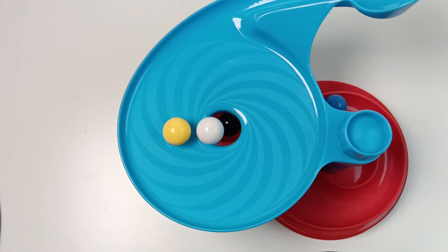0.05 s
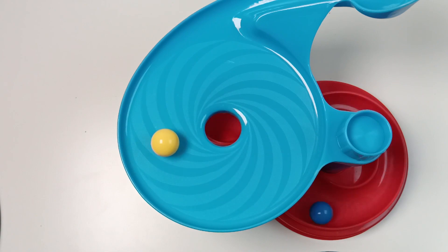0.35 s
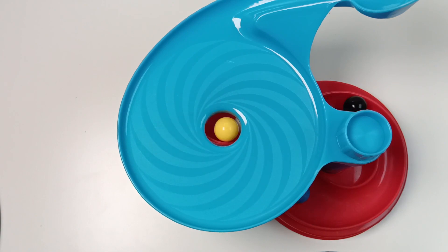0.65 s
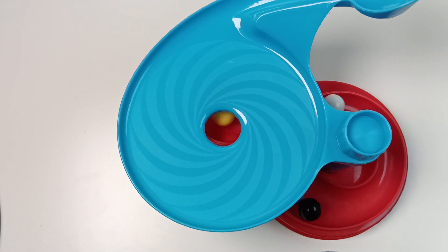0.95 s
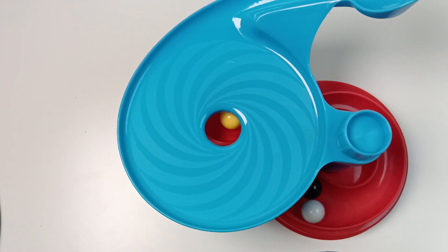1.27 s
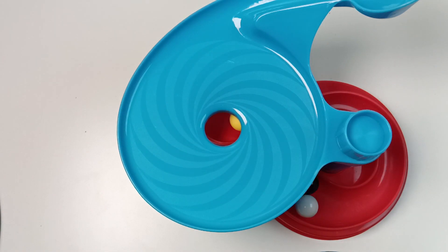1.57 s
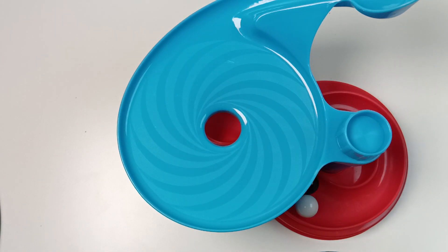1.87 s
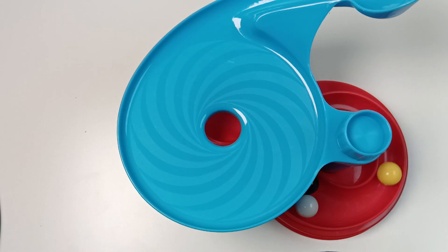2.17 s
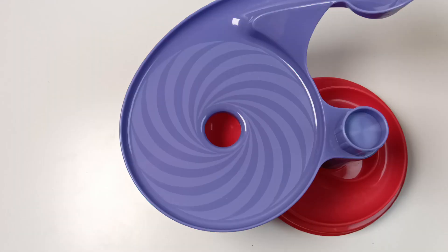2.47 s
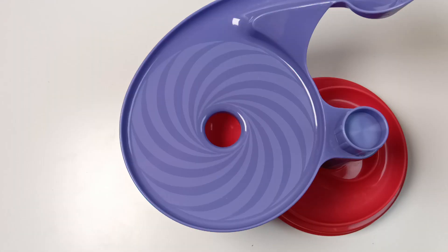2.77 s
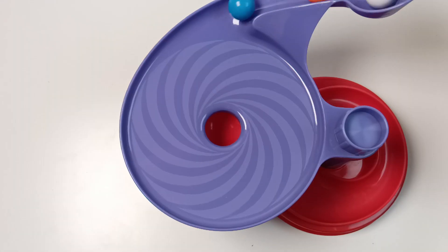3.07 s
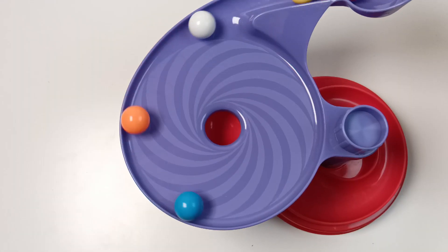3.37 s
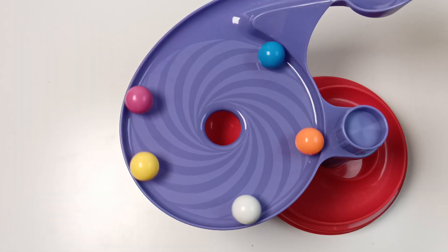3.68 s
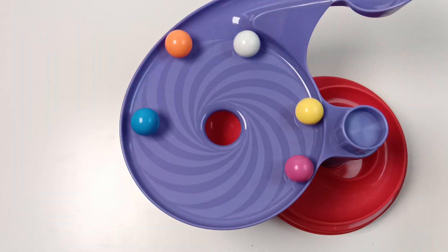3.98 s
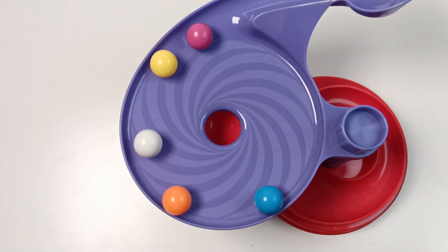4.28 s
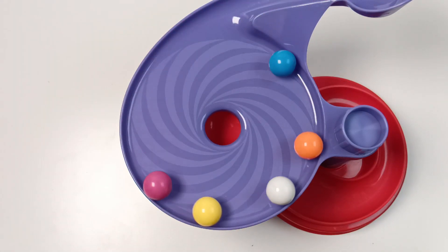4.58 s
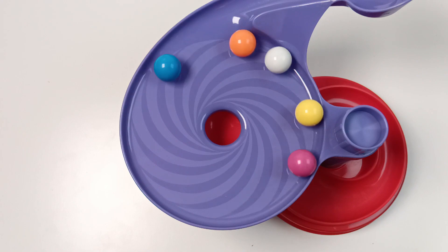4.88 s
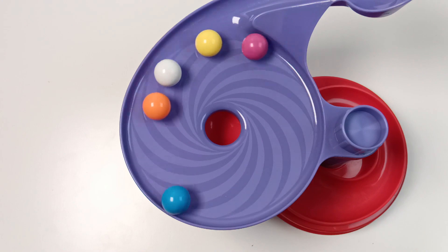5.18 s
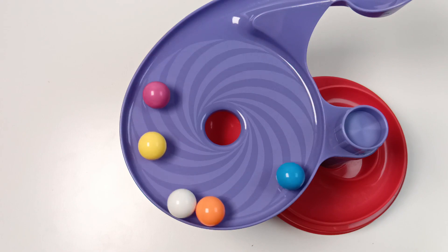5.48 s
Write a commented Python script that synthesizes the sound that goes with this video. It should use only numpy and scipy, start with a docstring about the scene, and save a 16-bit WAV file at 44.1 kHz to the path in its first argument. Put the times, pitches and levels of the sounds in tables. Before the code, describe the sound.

Heard from close above in a small room, marbles clatter through a plastic toy run, each knock ringing briefly, with ticks and whirring as they circle a dish. The sound cuts off, and after a moment of quiet another batch bounces down a ramp. These roll round and round a bowl with a wavering, hollow rumble that gradually fades, dotted with light clacks against the rim.

```python
"""Marbles clatter and roll through a plastic toy run in a small room, heard from just above. First they drop
through a funnel's throat, knock down the tower and circle in a dish; that sound breaks off. Then five marbles
land on a ramp, swirl round a bowl, hop off each other or at its entry notch, bump its rim and slow down. Each
knock sets the plastic ringing. Rolling shakes it with tiny bumps and a whirr that rises with speed. Behind them
are the low hum of the swaying stand, a thin high tone, short echoes and still air."""
import sys
import numpy as np
from scipy import signal
from scipy.fft import rfft, irfft
from scipy.io import wavfile
from scipy.ndimage import uniform_filter1d

SR = 44100
rng = np.random.default_rng(int(sys.argv[2]) if len(sys.argv) > 2 else 0)


def pcm_store(signal):
    """Save signal as 16-bit PCM."""
    levels = np.round(np.clip(np.atleast_2d(signal), -1, 1) * 32767)
    wavfile.write(sys.argv[1], SR, levels.astype(np.int16).T)


N = 248724
TIME = np.arange(N) / SR
TAPS = 4096  # samples in one filter or one knock
HZ = np.fft.rfftfreq(TAPS, 1 / SR)

# Marbles land in the tower and dish. Each row: start in seconds, level in dB, extra body in dB,
# extra sharpness in dB, first hop in seconds, loss per bounce in dB.
TOWER_LANDINGS = [(0.1126, -56, 5, -31, 0.016, 10), (0.3534, -23, 6.5, 2, .0185, 2),
                  (0.4156, -22, -6.5, -1.5, 0.024, 2.5), (0.4802, -28, -3, -5, 0.025, 13.5),
                  (0.5253, -30.5, 2.5, -2, .009, 3.5), (0.5362, -18.5, -3, 0, 0.035, 11),
                  (0.5849, -22, 0.5, -2, .018, 11), (0.732, -31.5, -19, -17, 0.02, 3),
                  (0.774, -21, -2, -4.5, .0174, 6), (0.7802, -21, -5, -0.5, .037, 2.5),
                  (1.0541, -23, 0.5, 5, 0.031, 5), (1.1043, -25.5, 1.5, -1.5, .0113, 4),
                  (1.215, -36.5, -9.5, -9.5, .025, 15), (1.394, -30, -12, 4.5, 0.0077, 13),
                  (1.4126, -24.5, -0.5, 6.5, 0.022, 3.5), (1.448, -29, 4.5, -2.5, .008, 7.5),
                  (1.7529, -30.5, -31, -20, 0.041, 24), (2.2578, -43.5, -3, -16.5, 0.022, 12),
                  (2.4125, -28.5, 3.5, 9.5, 0.016, 5.5)]
# The tower's overall tone. Each row: frequency in Hz, gain in dB.
TOWER_TONE = [(60, -30), (250, -28), (500, -7), (1000, -4), (2500, 2), (5000, -7.5), (9000, -16),
              (13000, -33), (15500, -30.5)]
# The notes the tower rings at. Each row: pitch in Hz, width in Hz, boost in dB.
TOWER_NOTES = [(115.1, 20, 20), (189, 49, 17), (455, 37, 2.6), (553, 39, 5), (663.4, 65, 13.7),
               (1189, 28, 11), (1708, 54, 4.8), (2107, 61, 8.2), (6620, 280, 6)]


def tower():
    """Marbles bounce down the tower, making it ring, and circle in the dish."""
    blows = [blow for row in TOWER_LANDINGS
             for blow in bounces(*row, fuller_db=0.23, duller_db=5, count=3)]
    gain_db = plastic(TOWER_TONE, TOWER_NOTES)
    falls = knocks(blows, gain_db, fade_s=0.0019, ring_s=0.0093, ring_db=-5, alike_hz=1680)
    return room(falls + dish_roll() + dish_ticks(), wet_db=-4, build_s=0.0048)


# Marbles land on the ramp. Each row: start in seconds, level in dB, first hop in seconds.
RAMP_LANDINGS = [(2.9683, -21.5, 0.014), (3.0762, -21, 0.018), (3.1221, -31.5, .012), (3.1954, -22, .015),
                 (3.2455, -28.5, 0.0077), (3.2884, -27, .0057), (3.3606, -21, .035), (3.4534, -21.5, .0205),
                 (3.604, -41, 0.0096)]
# They skitter down it. Each row: start in seconds, length in seconds, level in dB.
RAMP_SKITTER = [(2.975, 0.667, -46.5)]
# The ramp's overall tone. Each row: frequency in Hz, gain in dB.
RAMP_TONE = [(60, -32.5), (150, -8.5), (300, -16), (600, -1.5), (1300, 0.5), (3200, -3.5), (6000, -8.5),
             (10500, -16.5), (13000, -21.5), (15500, -16)]
# The notes the ramp rings at. Each row: pitch in Hz, width in Hz, boost in dB.
RAMP_NOTES = [(197.8, 17.5, 10.4), (504, 370, 1.7), (570, 77, 3.7), (656.5, 22, 8.1), (1300, 74, 7.8),
              (1580, 130, 2.7), (3114, 400, 6.7), (4030, 390, 6.1), (4200, 110, 2.8), (6690, 100, 6.1)]
FIRST_DROP_S = RAMP_LANDINGS[0][0]


def ramp():
    """Marbles land on the ramp, bounce and skitter down it."""
    gain_db = plastic(RAMP_TONE, RAMP_NOTES)
    blows = []
    for s, db, hop_s in RAMP_LANDINGS:
        blows += bounces(s, db, body_db=-2, sharp_db=-1.7, hop_s=hop_s,
                         loss_db=6, fuller_db=3.5, duller_db=2.5, count=2)
    landings = knocks(blows, gain_db, fade_s=0.0015, ring_s=0.012, ring_db=-2.5, alike_hz=1780)
    brighter_db = read([(2000, 2), (8000, 6)], HZ)
    skitter = chatter(RAMP_SKITTER, gain_db + brighter_db, hops_per_s=730, spread_db=2)
    slightly_left = amp([[0.25], [-0.25]])
    return room((landings + skitter) * slightly_left, wet_db=-0.5, build_s=0.0051)


def bowl():
    """Marbles clack, roll and hum round the bowl."""
    clacks, roll = rim_clacks(), bowl_roll()
    return room(clacks + roll + glides(), wet_db=-8, build_s=0.0018)


# A marble hops as it knocks another marble or passes the bowl's entry notch, and lands against the rim. # Each
# row: take-off in seconds, hop length in seconds, landing level in dB.
RIM_HOPS = [(3.9399, .0283, -34.5), (4.0913, 0.025, -33.5), (4.2101, 0.028, -29), (4.3487, .0251, -29.5),
            (4.4417, .0216, -32), (4.615, 0.01, -65), (4.7128, 0.012, -37.5), (5.181, 0.0045, -55),
            (5.3138, 0.0071, -49), (5.5281, 0.01, -44.5), (5.6049, 0.0094, -39.5)]
# The rim's overall tone. Each row: frequency in Hz, gain in dB.
RIM_TONE = [(60, -21.5), (170, -5.5), (300, -17.5), (600, -3.5), (1500, -0.5), (5000, -13.5),
            (10000, -17.5), (15500, -32)]
# The notes the rim rings at. Each row: pitch in Hz, width in Hz, boost in dB.
RIM_NOTES = [(586, 220, 14.6), (1237, 51, 6.1), (1710, 336, 13.4), (3094, 370, 10.8), (3850, 190, 10.3),
             (5720, 1200, 7.3)]


def rim_clacks(fast_hop_s=0.028, rattle_db=-43, lead_s=0.0098, trail_s=0.021):
    """Each hop is a tick at take-off, a rattle, and a landing with one bounce."""
    blows, rattles = [], []
    for s, hop_s, db in RIM_HOPS:
        # A shorter hop means a slower marble, which sounds weaker, thinner and duller.
        pace_db = 20 * np.log10(hop_s / fast_hop_s)
        change_db = pace_db * np.array([0.63, 1, 1.56])  # level, body, sharpness
        take_off_db = (-41.5, 4, 11.5) + change_db
        body_db, sharp_db = (-7, 1.5) + change_db[1:]
        blows.append((s, *take_off_db))
        blows += bounces(s + hop_s, db, body_db, sharp_db, HOP_SHARE * hop_s,
                         loss_db=7.5, fuller_db=-2.5, duller_db=20, count=1)
        rattles.append((s - lead_s, lead_s + hop_s + trail_s, rattle_db + pace_db))
    gain_db = plastic(RIM_TONE, RIM_NOTES)
    clacks = knocks(blows, gain_db, fade_s=0.0025, ring_s=0.01, ring_db=-2, alike_hz=1770)
    return clacks + chatter(rattles, gain_db, hops_per_s=990, spread_db=0)


# The bowl's overall tone. Each row: frequency in Hz, gain in dB.
BOWL_TONE = [(60, -30), (300, -10.5), (600, 3), (1700, 0), (2600, -8.5), (5000, -16), (10000, -29.5),
             (15500, -66.5)]
# The notes the bowl rings at. Each row: pitch in Hz, width in Hz, boost in dB.
BOWL_NOTES = [(180, 47, 14), (550, 230, 5.8), (788, 59, 6.3), (1223, 140, 10.7), (1430, 170, 3.3),
              (1733, 790, 13.5), (2890, 1900, 4.9)]


def bowl_roll(all_in_s=3.624, all_in_db=-33.5, nearest_s=5.1, lap_s=0.89):
    """Rolling grows until all the marbles are in the bowl, then dies down as they slow."""
    before, after = np.maximum(all_in_s - TIME, 0), np.maximum(TIME - all_in_s, 0)
    settle_db = 11.5 * (1 - np.exp(-after / 0.3))  # the marbles leave the wall
    lap_db = np.cos(2 * np.pi * (TIME - nearest_s) / lap_s)  # they pass close by in a bunch once a lap
    level_db = all_in_db - 23.5 * before - settle_db - 5 * after + lap_db
    roll = rolling(level_db, plastic(BOWL_TONE, BOWL_NOTES), bowl_whirr(),
                   note_db=-18, bumps_per_s=2400, spread_db=1.5, wobble_db=2)
    return roll * (TIME > FIRST_DROP_S)


def bowl_whirr(lap_s=0.8, swing=0.2, slowing_per_s=0.11, marbles=5):
    """Each marble speeds up and slows once a lap on its oval path, and loses speed overall."""
    out = np.zeros(N)
    slowdown = np.exp(-slowing_per_s * np.maximum(TIME - FIRST_DROP_S, 0))
    for k, hz in enumerate(np.geomspace(640, 1750, marbles)):
        lap = np.sin(2 * np.pi * (TIME / lap_s + 2 * k / marbles))
        speed = (1 + swing * lap) * slowdown
        out += whirr(hz * speed, width_hz=28) * (1 + lap / 2)
    return evened(out)


# Single marbles climb the bowl.
# Each row: start in seconds, length in seconds, first pitch in Hz, last pitch in Hz, level in dB.
GLIDES = [(3.6, .28, 676, 493, -47.5), (3.76, 0.16, 950, 730, -52), (4.08, 0.23, 821, 468.6, -41),
          (4.351, 0.163, 661, 558, -48.5)]


def glides():
    """A climbing marble loses speed, so its hollow note falls."""
    out = np.zeros((2, N))
    for s, length_s, first_hz, last_hz, db in GLIDES:
        hz = np.interp(TIME, [0, length_s], [first_hz, last_hz])
        note = whirr(hz, width_hz=63)[:round(length_s * SR)]
        add(out, s, amp(db) * evened(note) * signal.windows.hann(len(note)))
    return out


# A marble sweeps round the throat or dish. Each row: fastest moment in seconds, level in dB,
# rise in seconds, fade in seconds, pitch in Hz when the level is at base_db.
DISH_PASSES = [(0, -43.5, .02, 0.051, 1230), (.116, -37.5, .006, 0.022, 1220),
               (0.251, -41.5, .035, 0.044, 980), (.46, -39, .07, .08, 1200), (0.779, -42, .02, 0.11, 1190),
               (1.17, -48, .06, .11, 1170), (1.74, -46.5, .025, 0.035, 1190), (2.02, -65.5, .08, .1, 1181),
               (2.2, -48.5, .05, .06, 1180)]
# The dish's overall tone. Each row: frequency in Hz, gain in dB.
DISH_TONE = [(60, -14), (300, -12), (700, 6), (1200, 4), (2500, 0), (4000, -15), (8000, -38), (15500, -45)]
# The notes the dish rings at. Each row: pitch in Hz, width in Hz, boost in dB.
DISH_NOTES = [(912, 38, 7.7), (1219, 150, 12), (1721, 120, 7.6), (2100, 210, 7.6)]


def dish_roll(base_db=-46, hz_per_db=11):
    """One marble at a time circles; the faster it runs, the louder and higher it whirrs."""
    passes = [db - 20 / np.log(10) * np.maximum((s - TIME) / rise_s, (TIME - s) / fade_s)
              for s, db, rise_s, fade_s, _ in DISH_PASSES]
    level_db = np.maximum(np.max(passes, axis=0), -100)
    pass_s, *_, pass_hz = np.transpose(DISH_PASSES)
    hz = np.interp(TIME, pass_s, pass_hz) + hz_per_db * (level_db - base_db)
    note = whirr(hz * (1 + 0.06 * wobble()), width_hz=150)
    return rolling(level_db, plastic(DISH_TONE, DISH_NOTES), note,
                   note_db=-11, bumps_per_s=1300, spread_db=2, wobble_db=0.5)


# Runs of ticks in the throat and dish. Each row: start in seconds, length in seconds, level in dB.
DISH_TICKS = [(.19, 0.24, -51), (.66, 0.049, -49.5), (1.29, .1, -59.5), (1.67, 0.13, -51), (2.19, .2, -57)]


def dish_ticks(top_hz=3600):
    """A slow marble ticks over ridges; each soft touch shakes the plastic with little treble."""
    treble_cut_db = np.maximum(-10 * np.log10(1 + (HZ / top_hz) ** 12), -45)
    bass_cut_db = read([(700, -8), (2300, 0)], HZ)
    gain_db = plastic(TOWER_TONE, TOWER_NOTES) + treble_cut_db + bass_cut_db
    ticks = chatter(DISH_TICKS, gain_db, hops_per_s=100, spread_db=2)
    waves = flutter(fade_s=0.0016, ring_s=0.006, ring_db=-9)
    return signal.oaconvolve(ticks, waves / np.linalg.norm(waves[0]), axes=1)[:, :N]


HOP_SHARE = 0.59  # each hop lasts this share of the one before


def bounces(s, db, body_db, sharp_db, hop_s, loss_db, fuller_db, duller_db, count):
    """Lists a landing and its bounces: each hop is shorter, each blow weaker and duller."""
    return [(s + hop_s * sum(HOP_SHARE ** np.arange(k)),
             db - loss_db * k, body_db + fuller_db * k, sharp_db - duller_db * k)
            for k in range(count + 1)]


def knocks(blows, gain_db, fade_s, ring_s, ring_db, alike_hz):
    """Each blow sets the plastic ringing; short, hard ones are sharper, though not at the very top."""
    out = np.zeros((2, N))
    body = read([(150, 0.45), (500, 1), (1100, 0.77), (1900, 0)], HZ)
    sharp = read([(2800, 0), (7000, 1)], HZ)
    top = read([(10000, 0.3), (12500, 0.99)], HZ)
    for s, db, body_db, sharp_db in blows:
        waves = stereo(flutter(fade_s, ring_s, ring_db), alike_hz)
        blow = colour(waves, gain_db + body_db * body + sharp_db * sharp - max(sharp_db, 0) * top)
        attack = band_rms(blow[:, :256], 1500, 4000)  # db sets this band at the start of the blow
        add(out, s, amp(db) * blow / attack)
    return out


def flutter(fade_s, ring_s, ring_db):
    """A blow bends the plastic in waves: a dense burst that swells and dies, and a weaker ring."""
    t = TIME[:TAPS]
    spectrum = rfft(rng.standard_normal((2, TAPS)) * np.sqrt(t) * np.exp(-t / fade_s))
    flattened = spectrum / np.sqrt(uniform_filter1d(abs(spectrum) ** 2, size=110, axis=1))
    burst = np.roll(irfft(flattened), 8, axis=1) * (t < t[-1] / 2)
    ring = rng.standard_normal((2, TAPS)) * np.exp(-t / ring_s) * (1 - np.exp(-t / fade_s))
    return evened(burst) + amp(ring_db) * evened(ring)


def plastic(tone, notes):
    """Gain in dB of a plastic part, which rings at its own notes and gives off almost no deep bass."""
    peaks = sum(db / (1 + (2 * (HZ - hz) / width) ** 2) for hz, width, db in notes)
    return read(tone, HZ) + peaks + read([(20, -15.5), (60, 3)], HZ)


def rolling(level_db, gain_db, note, note_db, bumps_per_s, spread_db, wobble_db):
    """Marbles whirr and ride over tiny bumps; both shake the plastic."""
    sound = colour(patter(bumps_per_s, spread_db) + amp(note_db) * note, gain_db)
    return sound / band_rms(sound, 700, 3000) * amp(level_db + wobble_db * wobble())


def whirr(hz, width_hz):
    """A fuzzy note, like a spinning marble's: a narrow band of noise that follows the pitch hz."""
    decay = np.exp(-np.pi * width_hz / SR)
    noise = rng.standard_normal(N) + 1j * rng.standard_normal(N)
    haze = signal.lfilter([1], np.poly([decay, decay]), noise)
    return evened((haze * np.exp(2j * np.pi * np.cumsum(hz) / SR)).real)


def chatter(rows, gain_db, hops_per_s, spread_db):
    """A marble loses contact and hops along the plastic for a moment."""
    gate = np.zeros((1, N))
    for s, length_s, db in rows:
        add(gate, s, amp(db) * signal.windows.tukey(round(length_s * SR), 0.25))
    return gate * evened(colour(patter(hops_per_s, spread_db), gain_db))


def patter(per_s, spread_db):
    """Tiny taps at random moments, a few of them larger."""
    hits = rng.random(N) < per_s / SR
    sizes = amp(spread_db * np.minimum(rng.exponential(1, N), 4))
    return evened(stereo(hits * sizes * rng.standard_normal((2, N)), alike_hz=880))


# The whole stand sways. Each row: start in seconds, level in dB, pitch in Hz.
SWAYS = [(1.83, -64, 80), (5.001, -58.5, 126), (5.059, -65, 115)]


def sways(rise_s=0.015):
    """The stand rocks on the table with a soft, low hum."""
    out, t = np.zeros((2, N)), TIME[:SR // 3]
    swell = t / rise_s * np.exp(1 - t / rise_s)
    for s, db, hz in SWAYS:
        add(out, s, amp(db) * swell * np.sin(2 * np.pi * hz * t))
    return out


# How loud the thin tone is. Each row: time in seconds, level in dB.
THIN_TONE_LEVELS = [(2.6, -105), (2.87, -82), (2.95, -83.5), (3.0, -56), (3.5, -56), (3.7, -110)]


def thin_tone(hz=6880):
    """A faint, thin high tone swells before the drops on the ramp and lasts through them."""
    level_db = np.interp(TIME, *np.transpose(THIN_TONE_LEVELS))
    return amp(level_db) * whirr(np.full(N, hz), width_hz=90)


# How long the echoes last. Each row: frequency in Hz, seconds to fade by 60 dB.
ECHO_TIMES = [(120, 0.5), (400, 0.36), (1200, 0.2052), (3000, 0.33), (8000, 0.23), (15000, 0.03)]
# The tone of the echoes. Each row: frequency in Hz, gain in dB.
ECHO_TONE = [(120, 5), (300, 3.5), (700, 0.5), (1300, -0.5), (3000, -5), (8000, -5), (15000, -7.5)]


def room(x, wet_db, build_s, first_echo_s=0.006):
    """Echoes build up from the walls and die band by band; they change as the marbles move."""
    out, t = np.zeros((2, N)), TIME[:SR * 3 // 4]
    for k in range(3):
        noise = stereo(rng.standard_normal((2, len(t))), alike_hz=690)
        hz, at_s, bands = signal.stft(noise, SR, nperseg=256)
        rate = np.log(1000) / read(ECHO_TIMES, hz)[:, None]
        fade = amp(read(ECHO_TONE, hz)[:, None]) * np.exp(-rate * at_s) * np.sqrt(2 * rate / SR)
        tail = signal.istft(bands * fade, SR, nperseg=256)[1][:, :len(t)]
        tail *= 1 - np.exp(-t / build_s)
        share = np.sqrt(2 / 3) * np.cos(2 * np.pi * (0.9 * TIME + k / 3))  # three echoes take turns
        add(out, first_echo_s, signal.fftconvolve(x * share, tail, axes=1))
    return x + amp(wet_db) * out


# The tone of the still air. Each row: frequency in Hz, gain in dB.
AIR_TONE = [(25, -7.5), (70, -4), (200, -5), (400, -12.5), (1200, -15), (3000, -27), (16000, -36.5)]


def still_air(level_db=-76.5):
    """The quiet room gives a very faint, low rush."""
    noise = stereo(rng.standard_normal((2, N)), alike_hz=35)
    return amp(level_db) * evened(colour(noise, read(AIR_TONE, HZ)))


def amp(db):
    """Turns decibels into a gain."""
    return 10 ** (np.asarray(db) / 20)


def evened(x):
    """Scales a sound to an average (rms) level of 1."""
    return x / np.sqrt(np.mean(x ** 2) + 1e-20)


def read(points, hz):
    """Reads between the rows of a table, on a log-frequency scale."""
    row_hz, value = np.transpose(points)
    return np.interp(np.log(hz + 1), np.log(row_hz), value)


def add(mix, s, sound):
    """Mixes a sound in at s seconds."""
    part = mix[:, round(s * SR):][:, :sound.shape[-1]]
    part += sound[..., :part.shape[-1]]


def colour(x, db):
    """Filters a sound by the gain db at each of HZ; narrow peaks ring after each push."""
    log_gain = np.log(amp(np.r_[db, db[-2:0:-1]]))
    response = np.fft.ifft(np.exp(np.conj(signal.hilbert(log_gain)))).real
    return signal.oaconvolve(x, response[None], axes=1)[:, :x.shape[1]]


def band_rms(x, lo_hz, hi_hz):
    """The average level between two frequencies."""
    band = signal.butter(2, [lo_hz, hi_hz], "band", fs=SR, output="sos")
    return np.sqrt(np.mean(signal.sosfilt(band, x) ** 2))


def stereo(x, alike_hz):
    """Turns two unrelated signals into a left and right that agree below alike_hz."""
    size = x.shape[1]
    same = 1 / np.sqrt(1 + (np.fft.rfftfreq(size, 1 / SR) / alike_hz) ** 2)
    left, other = rfft(x)
    return irfft([left, same * left + np.sqrt(1 - same ** 2) * other], size)


def wobble():
    """A random drift that changes every few hundredths of a second."""
    return evened(uniform_filter1d(rng.standard_normal(N), size=1100))


def scene(break_s=2.441):
    """The tower plays until it breaks off, then the ramp and bowl, all over still air."""
    before_break = np.clip((break_s - TIME) / 0.0095 + 0.5, 0, 1)
    return tower() * before_break + ramp() + bowl() + sways() + thin_tone() + still_air()


# How far the sound leans to the left. Each row: frequency in Hz, left minus right in dB.
LEFT_LEAN = [(200, 2), (400, 5), (700, 6), (1290, 13), (2380, 5), (4400, 1), (15000, -1.5)]


def record(dry, left_delay_samples=37, top_hz=16100):
    """The left side favours the middle range and hears a little later; the highest treble is cut."""
    lean_db = read(LEFT_LEAN, HZ)
    shared_db = -10 * np.log10((amp(lean_db) + amp(-lean_db)) / 2)  # keeps the total power the same
    left = colour(dry[:1], shared_db + lean_db / 2)
    right = colour(dry[1:], shared_db - lean_db / 2)
    left = np.pad(left, ((0, 0), (left_delay_samples, 0)))[:, :N]
    low_pass = signal.firwin(255, top_hz, window=("kaiser", 8), fs=SR)
    return signal.oaconvolve(np.vstack([left, right]), low_pass[None], "same", axes=1)


dry = scene()
out = record(dry)
pcm_store(out)
```